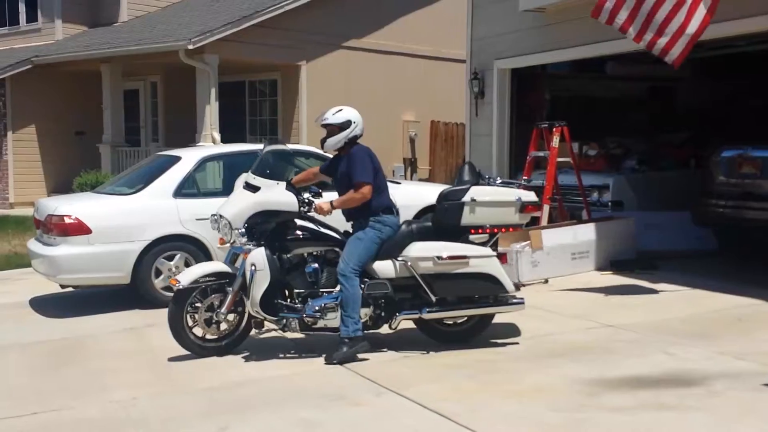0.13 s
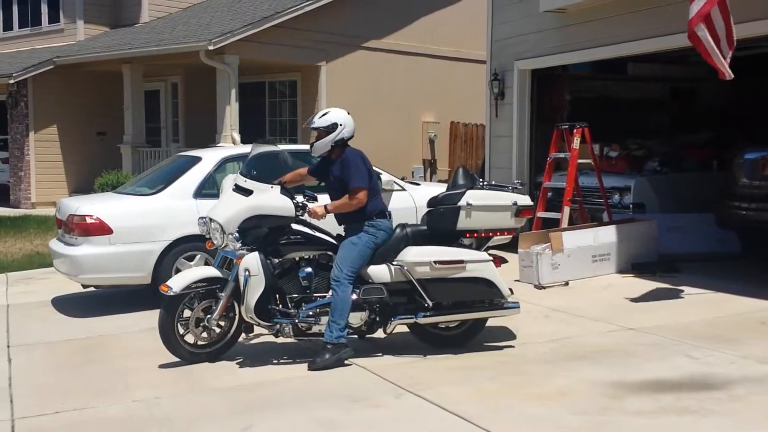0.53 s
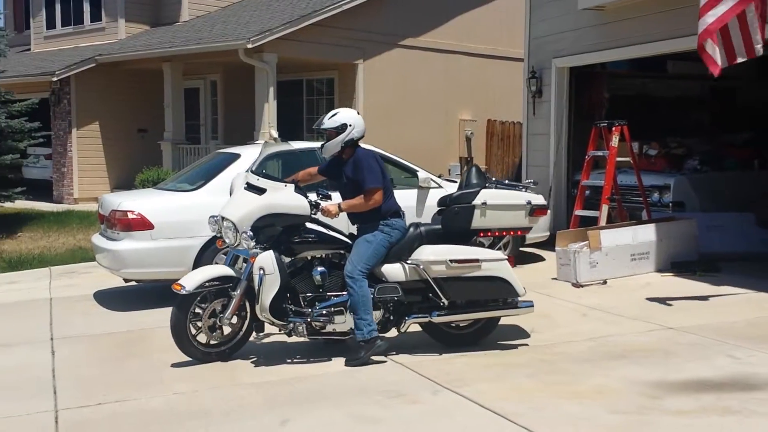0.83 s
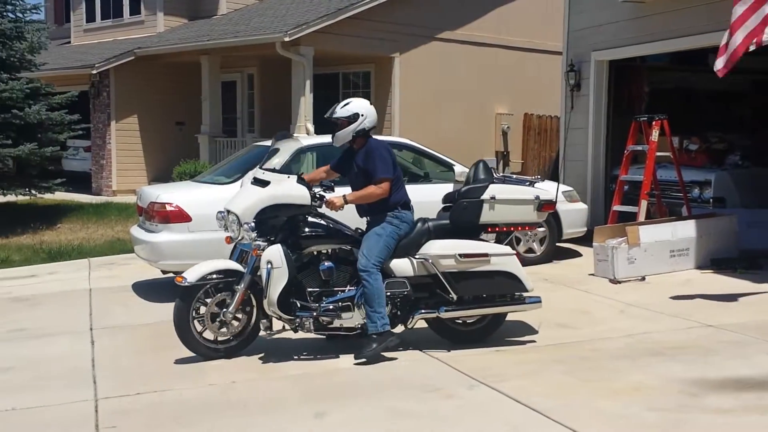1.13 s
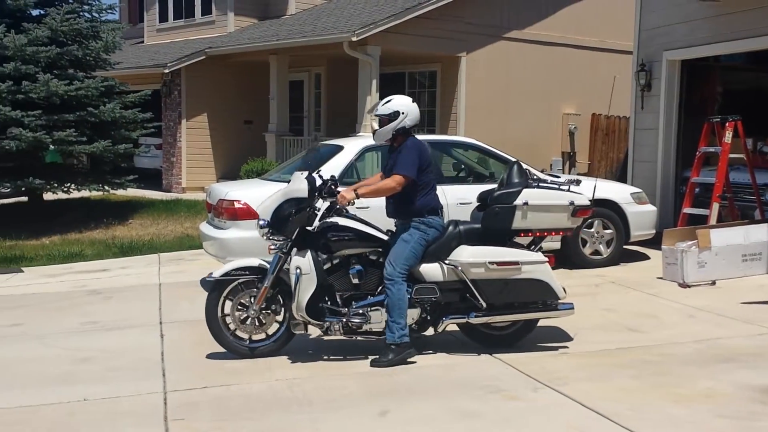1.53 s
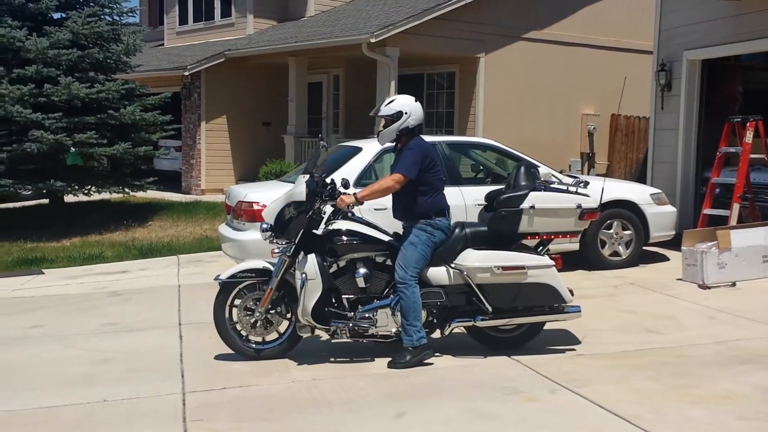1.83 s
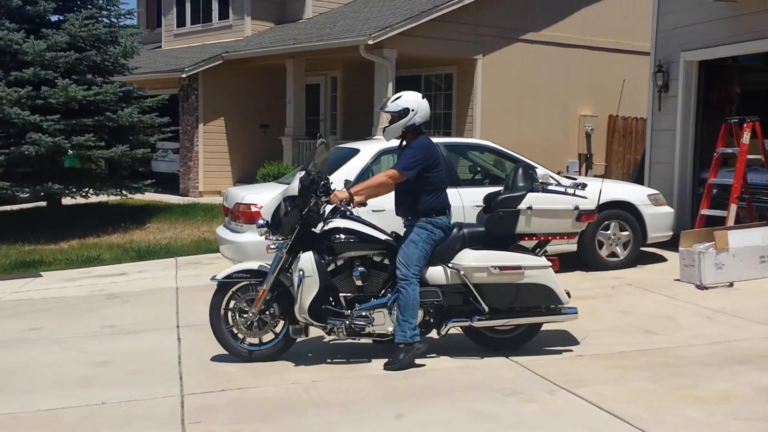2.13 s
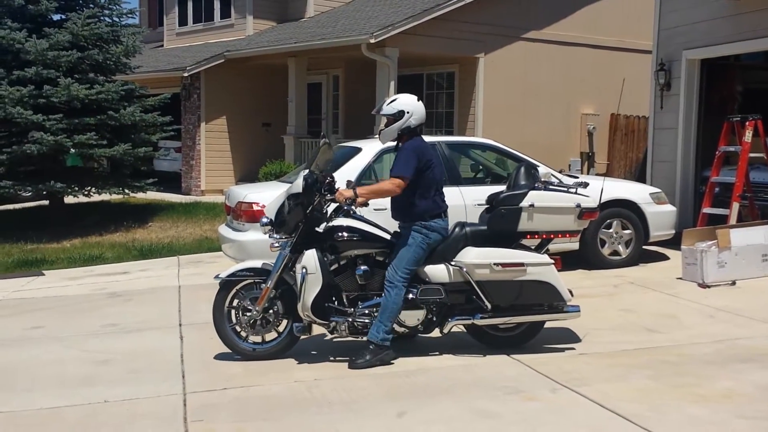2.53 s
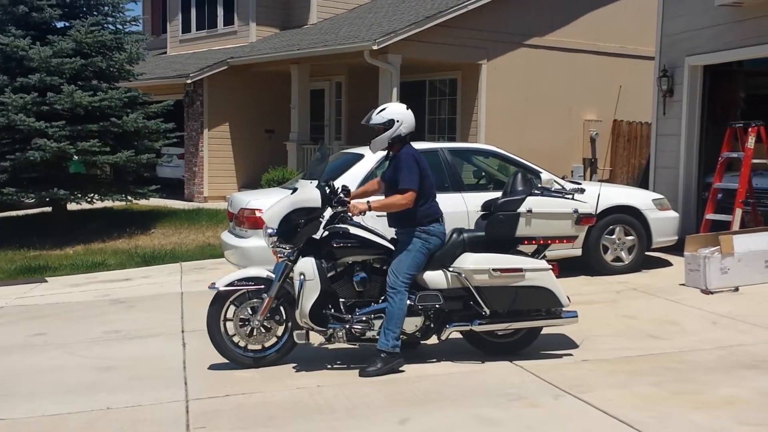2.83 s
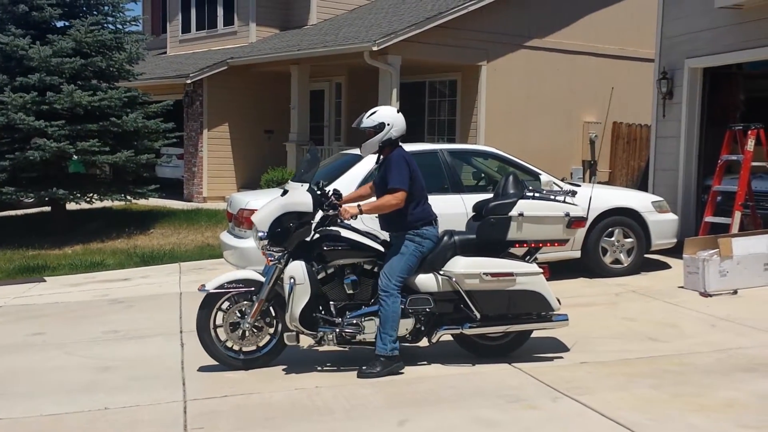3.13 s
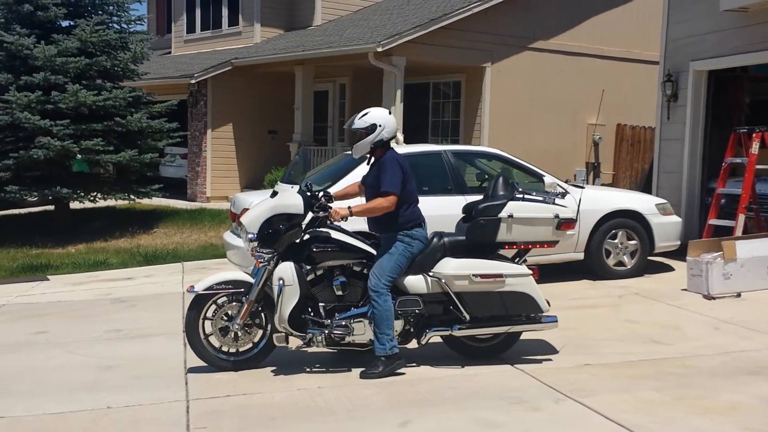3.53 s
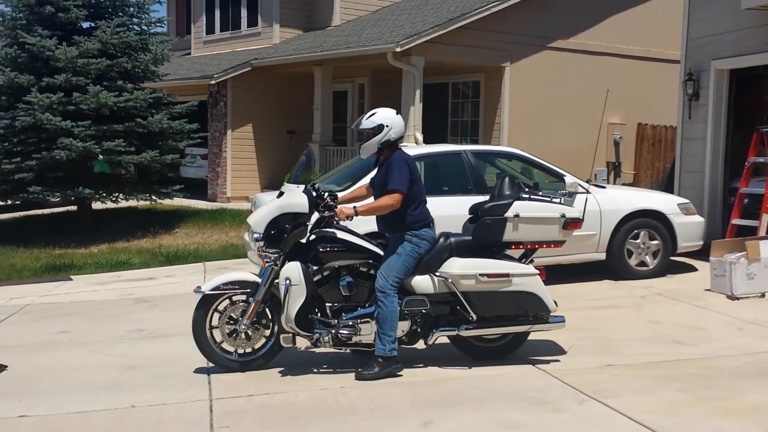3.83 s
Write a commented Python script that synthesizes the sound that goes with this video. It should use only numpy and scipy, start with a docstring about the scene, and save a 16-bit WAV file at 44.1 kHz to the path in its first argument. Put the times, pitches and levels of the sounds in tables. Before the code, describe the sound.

On a driveway beside a house, a motorcycle idles in front of stereo microphones, its lopsided exhaust beat mixed with valve clatter and gear whirr. One short, raspy rev comes late, then it falters and returns to idle.

```python
"""A driveway beside a house wall, where a V-twin motorcycle idles in front of a stereo microphone pair.
The beat is lopsided; there is one blip of the throttle, a stumble, and it settles. Each firing thumps
through the exhaust, the cases ring near 800 Hz, and valves and gears clatter in step with the crank.
The wall echoes the exhaust and the yard answers briefly. The sound fades in from silence."""
import sys
import numpy as np
from scipy import signal
from scipy.fft import rfft, irfft, next_fast_len
from scipy.io import wavfile
from scipy.ndimage import map_coordinates

SR = 44100
rng = np.random.default_rng(int(sys.argv[2]) if len(sys.argv) > 2 else 0)


def store_wav(level_fs):
    """Save 16-bit WAV to argv[1]."""
    pcm = np.round(np.clip(np.atleast_2d(level_fs), -1, 1) * 32767)
    wavfile.write(sys.argv[1], SR, pcm.T.astype(np.int16))


N = 176400

# the two firings: place_in_cycle (0-1)
FIRING_PLACES = [0, .435]
# strength of combustion: time_s, over_idle_db
COMBUSTION = [(3.21, 0.5), (3.245, 4), (3.31, 3), (3.405, -0.5), (3.435, 3.5), (3.52, -0.5), (3.68, 1.5),
              (3.765, -3.5), (3.805, 1)]
# exhaust resonances: pitch_hz, width_hz, first_cylinder_db, second_cylinder_db
PIPE_MODES = [(75.6, 19.4, 0.5, -1), (118, 42, -10, -12), (131, 10.8, -21, -3.5), (207.4, 17.5, -4.5, -6),
              (280.7, 14.3, -13.5, -14.5), (328.1, 31.8, -16.5, -19)]
# bark under throttle: frequency_hz, relative_db
BARK_SPECTRUM = [(60, -30), (180, -12.5), (300, 5.5), (350, -1.5), (440, -8.5), (800, -25), (1400, -16),
                 (3000, -40)]
# gas puff of each firing: frequency_hz, relative_db
PUFF_SPECTRUM = [(20, -23), (45, -7), (80, -1.5), (160, 2), (300, -1), (430, -20.5), (700, -9.5),
                 (1500, -62.5)]
# gas rasp under throttle: frequency_hz, relative_db
RASP_SPECTRUM = [(120, -25), (300, 0), (420, -3.5), (600, -7.5), (900, -13), (1350, -2.5), (1900, -13),
                 (3000, -24)]
def exhaust(jitter_s=.00035, scatter_db=.26, thump_db=-17.5, puff_db=-28, bark_db=-35, rasp_db=-42):
    """Unevenly spaced firings ring the pipes and each lets out a puff of gas; strong ones bark and rasp."""
    firings, excess, thump = 0, 0, 0
    centres, widths, *levels = np.transpose(PIPE_MODES)
    for place, mode_db in zip(FIRING_PLACES, levels):
        times = crank_times(place)
        late, size = rng.standard_normal((2, len(times)))
        load = amp(at(COMBUSTION, times))
        times = times + jitter_s * late
        pulses = impulses(times, load * amp(scatter_db * size))
        thump += filtered(-pulses, lambda hz: resonances(zip(centres, widths, mode_db), hz))
        firings += pulses
        excess += impulses(times, np.maximum(load - 1, 0))  # only the push above idle
    bark = unit(filtered(-excess, lambda hz: minimum_phase(BARK_SPECTRUM, hz)))
    gas = decaying(firings, decay_s=.047) * stereo_noise()
    puff = unit(filtered(gas, lambda hz: minimum_phase(PUFF_SPECTRUM, hz)))
    forced_gas = decaying(excess, decay_s=.053) * stereo_noise()
    rasp = unit(filtered(forced_gas, lambda hz: amp(along(RASP_SPECTRUM, hz))))
    return amp(thump_db) * unit(thump) + amp(rasp_db) * rasp + amp(bark_db) * bark + amp(puff_db) * puff


# progress of the crank: time_s, engine_cycles
CRANK_PROGRESS = [(.398, 0), (.8368, 5), (1.0954, 8), (1.3595, 11), (1.5386, 13), (1.992, 18), (2.5312, 24),
                  (2.8939, 28), (3.1602, 31), (3.2435, 32), (3.2755, 32.435), (3.312, 33), (3.433, 35),
                  (3.644, 38), (3.723, 39), (3.8077, 40), (4.07, 43)]
def crank_times(place):
    """Times at which the crank passes a place (0-1) in the engine cycle."""
    times, cycles = np.transpose(CRANK_PROGRESS)
    return np.interp(np.arange(cycles[-1]) + place, cycles, times)


# gear knocks: place_in_cycle, relative_db, decay_s
GEAR_LASH = [(.2, -11, .014), (.36, -6.5, 0.01), (.73, -4.5, 0.0071)]
# case resonances: pitch_hz, width_hz, relative_db
CASE_MODES = [(545, 165, -17), (688, 75, -9.5), (761, 43, -2), (836, 52, -3.5), (1363, 90, -15.5),
              (1548, 110, -15), (2284, 270, -22.5)]
# case ring, lower during the blip: time_s, relative_db
CASE_LEVEL = [(.55, -2), (.7, 2), (.96, 1), (1.02, -0.5), (1.042, 5), (1.09, 0.5), (1.6, 0), (3.15, 1),
              (3.35, -3), (3.5, -9), (3.7, 1.5)]
def engine_cases(level_db=-28.5, steady_drive=.41):
    """Gear lash knocks the cases between firings, over a steady ring."""
    drive = (steady_drive + bursts(GEAR_LASH, scatter_db=2.5)) * stereo_noise()
    ring = unit(filtered(drive, lambda hz: resonances(CASE_MODES, hz)))
    return amp(level_db + at(CASE_LEVEL, np.arange(N) / SR)) * ring


# chains, gears and intake: frequency_hz, relative_db
WHIRR_SPECTRUM = [(530, -17), (900, -2), (1050, -11.5), (1380, -4), (1580, -4.5), (1710, -8.5), (2360, -5),
                  (3380, -15), (5440, -4), (5910, -7.5), (7410, -7), (8050, -8.5), (8750, -19),
                  (10100, -22), (11900, -21.5), (14800, -33), (15500, -41)]
# swell of the whirr: time_s, over_idle_db
WHIRR_LEVEL = [(.7, -0.5), (1.35, 2.5), (1.7, 1.5), (3.23, 1), (3.28, 5), (3.34, 5), (3.42, 4.5), (3.48, 4),
               (3.54, 5), (3.7, 2), (3.9, 1)]
def whirr(level_db=-29.5, grain_db=.5, rough_db=1):
    """Chains, gears and intake make a grainy rush that swells with the throttle."""
    grain = amp(grain_db * wobble(per_s=411) + rough_db * wobble(per_s=40.26))
    rush = unit(filtered(grain * stereo_noise(), lambda hz: amp(along(WHIRR_SPECTRUM, hz))))
    return amp(level_db + at(WHIRR_LEVEL, np.arange(N) / SR)) * rush


# valve ticks: place_in_cycle, relative_db, decay_s
VALVE_TICKS = [(.04, 6, 0.0087), (.22, 2.5, 0.01), (.42, 4, .013), (.81, -6.5, 0.012)]
# intake spits as the throttle opens: start_s, level_db, decay_s
INTAKE_SPITS = [(3.247, -17.5, .005), (3.279, -19.5, 0.019), (3.315, -21, .008)]
# broad metal clatter: frequency_hz, relative_db
CLATTER_SPECTRUM = [(500, -33), (1300, -6), (2400, -5.5), (3300, -5.5), (5400, 2), (7600, 0), (9000, -6),
                    (12000, -9), (15500, -29.5)]
# rocker covers and cooling fins: pitch_hz, width_hz, over_clatter_db
FIN_MODES = [(4870, 86, 7), (5500, 75, 9.5), (6300, 120, 8.5), (7060, 140, 4.5), (7580, 96, 8),
             (10800, 110, -7)]
def clatter(tick_db=-34, rise_s=.001):
    """Valve ticks and sharp intake spits ring the rocker covers and cooling fins."""
    ticks = amp(tick_db) * unit(bursts(VALVE_TICKS, scatter_db=2))
    spits = sum(decaying(impulses(np.array([s]), [amp(db)]), decay_s) for s, db, decay_s in INTAKE_SPITS)
    envelope = decaying(ticks + spits, rise_s) / (rise_s * SR)  # rounds each attack
    metal = lambda hz: amp(along(CLATTER_SPECTRUM, hz)) * np.hypot(1, abs(resonances(FIN_MODES, hz)))
    return envelope * unit(filtered(stereo_noise(), metal))


def house_wall(x, delay_s=.022, gain=.53):
    """The direct sound plus the wall's echo, which travels about 7.5 m farther to the microphones."""
    return filtered(x, lambda hz: 1 + gain * np.exp(-2j * np.pi * hz * delay_s))


def yard(x, level_db=-16.5, t60_s=.34):
    """Short diffuse reflections from the car, garage and porch."""
    t = np.arange(SR // 2) / SR
    tail = rng.standard_normal((2, len(t))) * amp(-60 * t / t60_s)
    return amp(level_db) * signal.fftconvolve(x, tail / np.linalg.norm(tail[0]), axes=1)[:, :N]


# likeness of left and right: frequency_hz, correlation
MIC_LIKENESS = [(100, 1), (500, 0.93), (850, 1), (1400, 0.53), (2500, 0.57), (5000, -0.26), (12000, 0.25)]
def stereo_noise():
    """White noise as the two microphones share it: alike in the bass, largely apart in the treble."""
    angle = lambda hz: np.arccos(np.clip(along(MIC_LIKENESS, hz), -1, 1)) / 2
    shares = lambda hz: np.array([np.cos(angle(hz)), np.sin(angle(hz))])
    mid, side = filtered(rng.standard_normal((2, N)), shares)
    return np.array([mid + side, mid - side])


def bursts(table, scatter_db):
    """Envelope of contacts that recur each engine cycle with uneven strength."""
    envelope = 0
    for place, db, decay_s in table:
        times = crank_times(place)
        sizes = amp(db + scatter_db * rng.standard_normal(len(times)))
        envelope += decaying(impulses(times, sizes), decay_s)
    return envelope


def impulses(times, sizes):
    """One impulse at each time."""
    return np.bincount(np.round(times * SR).astype(int), sizes, N)[:N]


def decaying(x, decay_s):
    """Give each impulse an exponential tail."""
    return signal.lfilter([1], [1, -np.exp(-1 / (decay_s * SR))], x)


def wobble(per_s):
    """A smooth random curve with the given knots a second."""
    return map_coordinates(rng.standard_normal(N // 10), [np.arange(N) / SR * per_s], mode="wrap")


def resonances(modes, hz):
    """Causal response of (pitch_hz, width_hz, level_db) modes, alternating in sign."""
    return sum((-1) ** k * amp(db) * 1j * hz * width / (pitch ** 2 - hz ** 2 + 1j * hz * width)
               for k, (pitch, width, db) in enumerate(modes))


def minimum_phase(points, hz):
    """Causal response with the given (frequency_hz, level_db) spectrum."""
    cepstrum = irfft(np.log(amp(along(points, hz))))
    half = len(cepstrum) // 2
    cepstrum[1:half] *= 2
    cepstrum[half + 1:] = 0
    return np.exp(rfft(cepstrum))


def filtered(x, response):
    """Pass x through a frequency response."""
    size = 2 * next_fast_len(N // 2 + SR // 2)
    return irfft(rfft(x, size) * response(np.fft.rfftfreq(size, 1 / SR)), size)[..., :N]


def along(points, hz):
    """Interpolate (frequency_hz, value) points on a log axis."""
    frequencies, values = np.transpose(points)
    return np.interp(np.log(hz + 1), np.log(frequencies + 1), values)


def at(points, s):
    """Interpolate (time_s, value) points."""
    return np.interp(s, *np.transpose(points))


def amp(db):
    """Decibels to gain."""
    return 10 ** (np.asarray(db) / 20)


def unit(x):
    """Scale to rms 1."""
    return x / np.sqrt(np.mean(x ** 2) + 1e-20)


def scene():
    """The motorcycle on the driveway, the wall's echo of its exhaust, and the yard behind."""
    bike = house_wall(exhaust()) + engine_cases() + whirr() + clatter()
    return bike + yard(bike)


# balance of the microphones: frequency_hz, left_minus_right_db
MIC_BALANCE = [(60, 1.5), (200, 1), (700, .5), (2400, -1), (4400, 4), (8000, -4), (15000, -4.5)]
def record(dry):
    """The microphone pair's bass cut, left-right balance and band limit; the sound also fades in from silence."""
    low_cut_hz, top_hz = 49, 15600
    silent_until_s, fade_from_s, fade_to_s = .424, .41, .7
    t = np.arange(N) / SR
    fade = np.clip((t - fade_from_s) / (fade_to_s - fade_from_s), 0, 1) * (t > silent_until_s)
    bass_cut = lambda hz: 1 / np.hypot(1, (low_cut_hz / (hz + 1)) ** 6)
    balance = lambda hz: amp(along(MIC_BALANCE, hz) * np.array([[.5], [-.5]]))
    heard = filtered(dry, lambda hz: bass_cut(hz) * balance(hz))
    return filtered(heard * fade, lambda hz: hz < top_hz)


dry = scene()
out = record(dry)
store_wav(out)
```